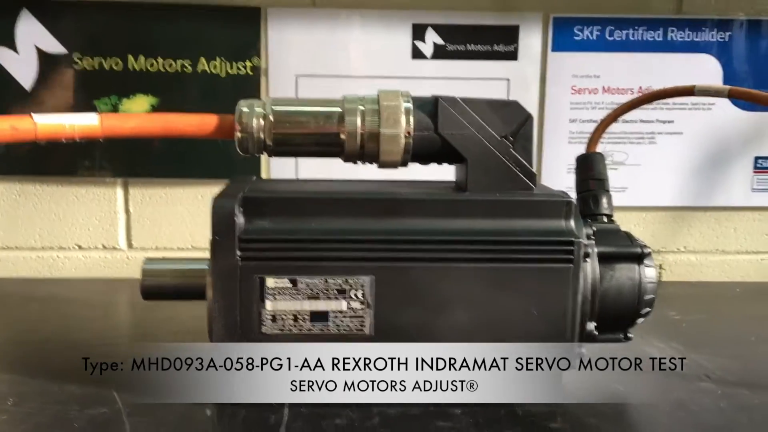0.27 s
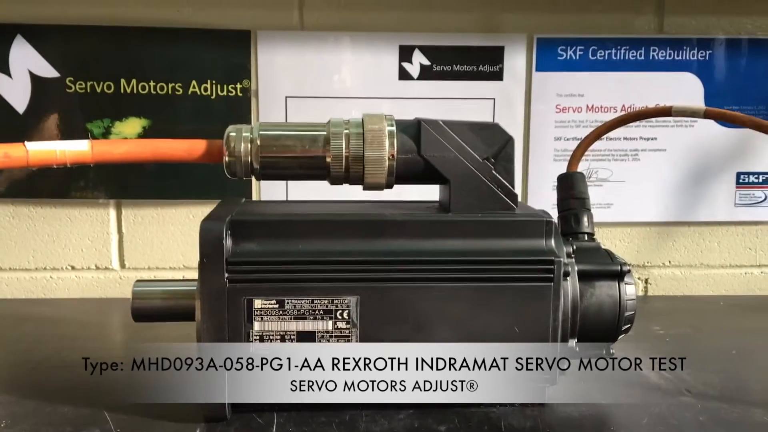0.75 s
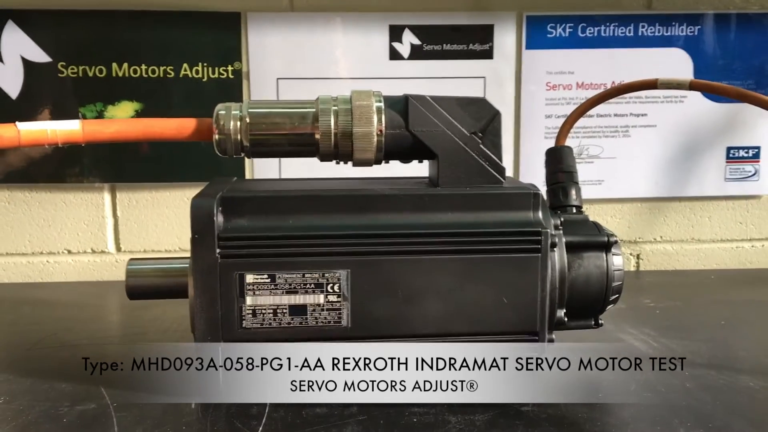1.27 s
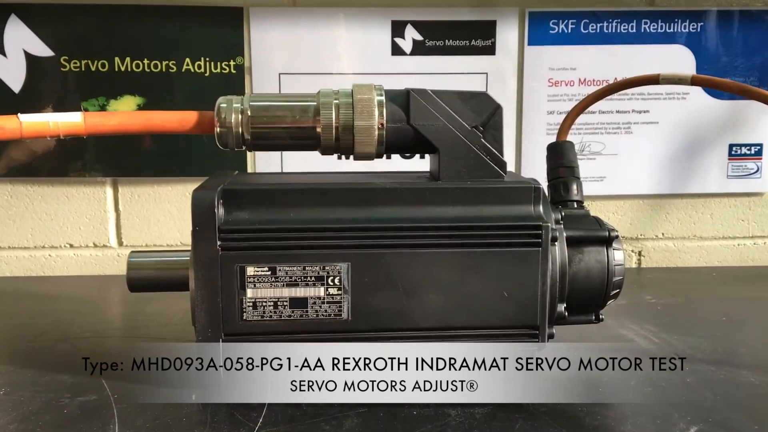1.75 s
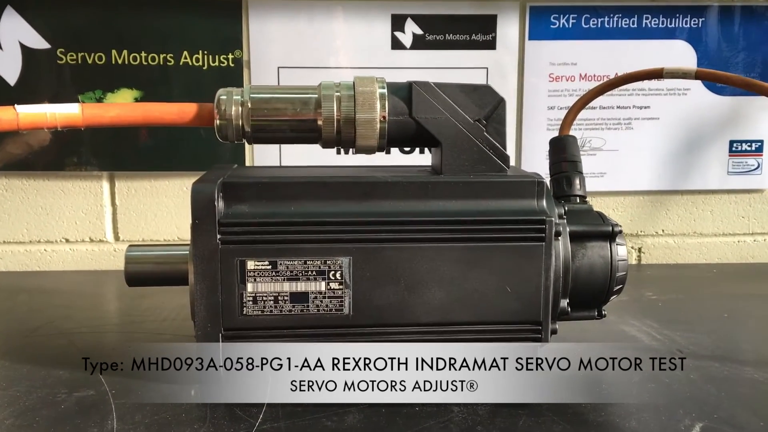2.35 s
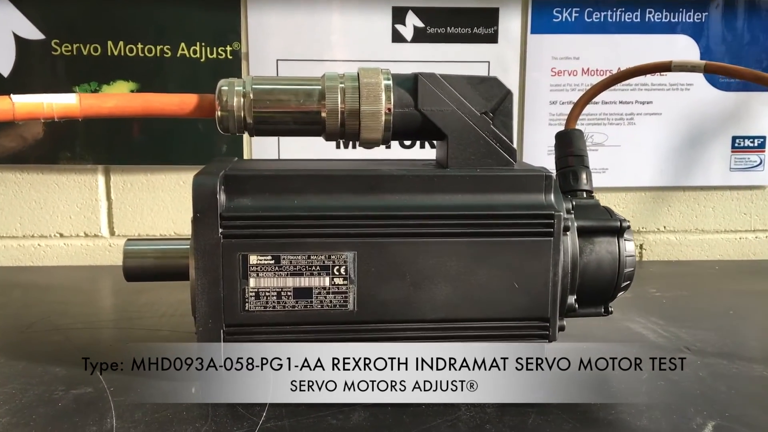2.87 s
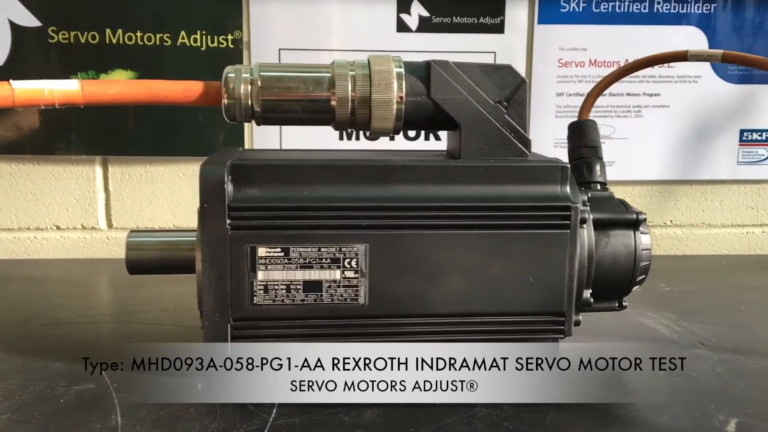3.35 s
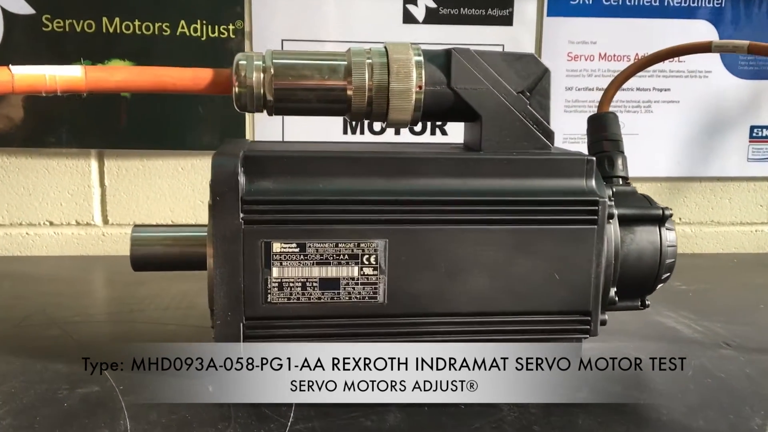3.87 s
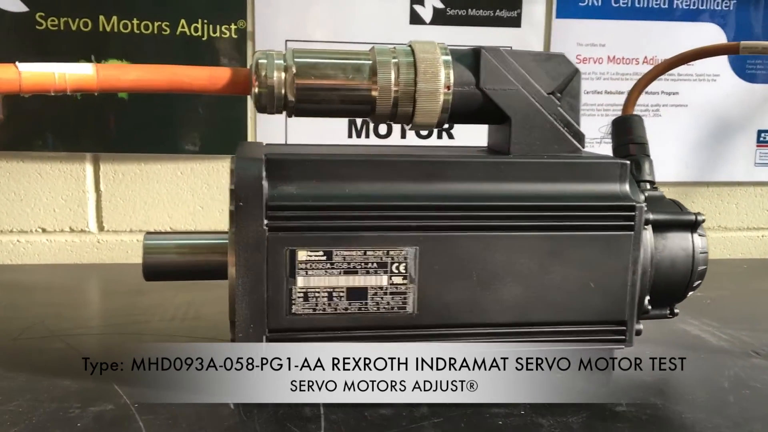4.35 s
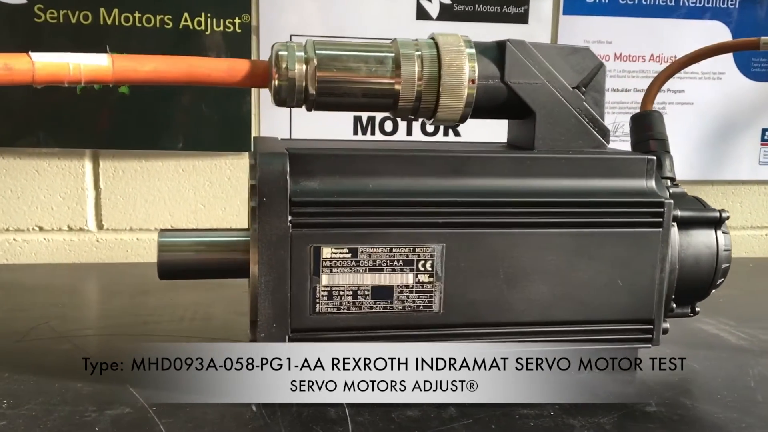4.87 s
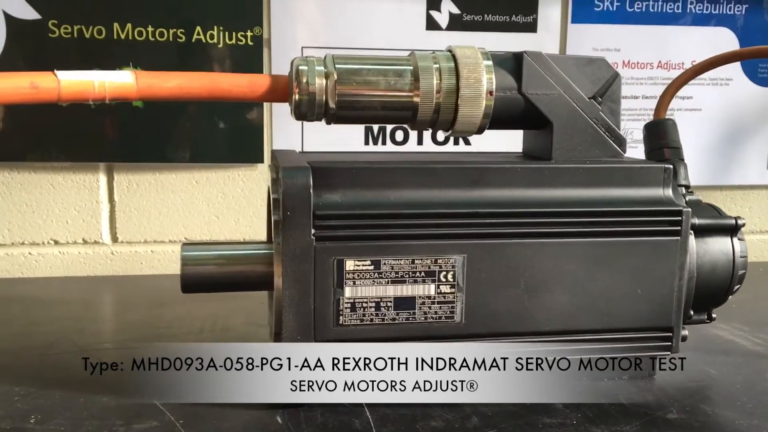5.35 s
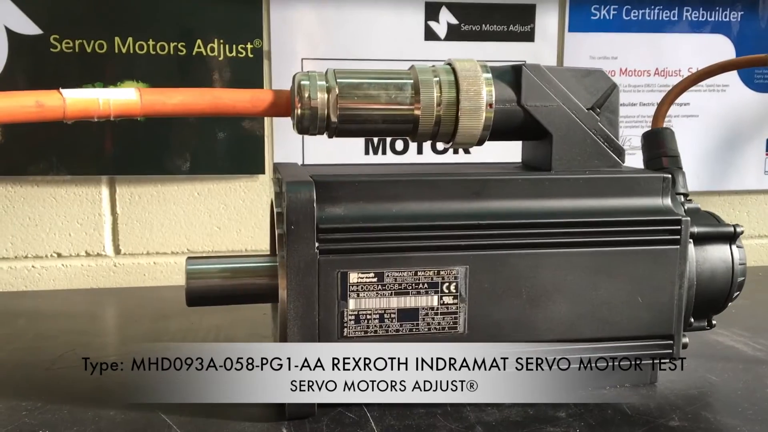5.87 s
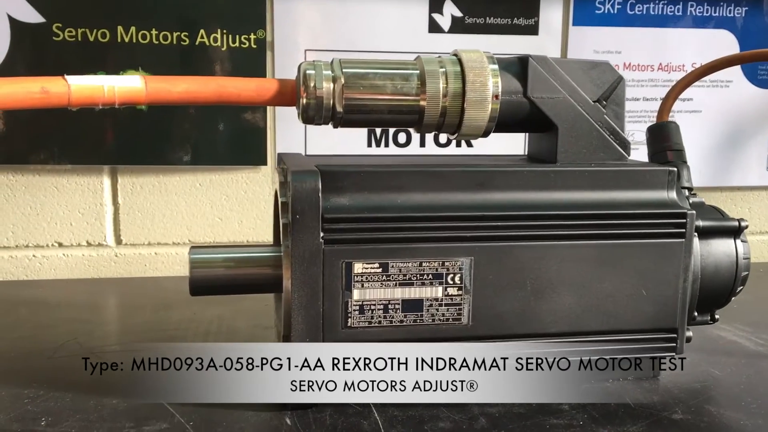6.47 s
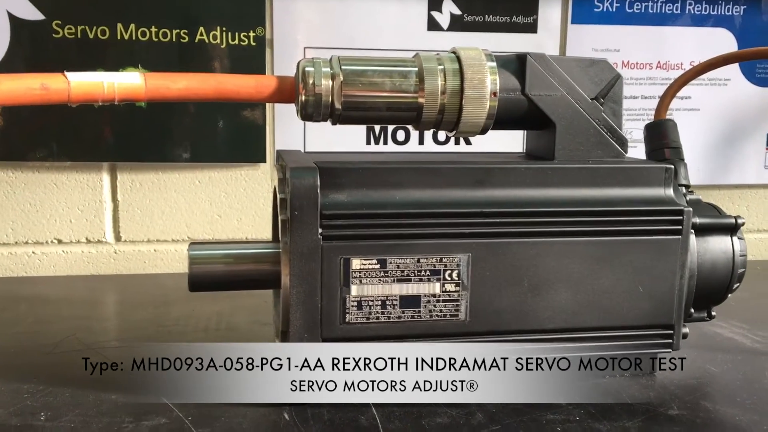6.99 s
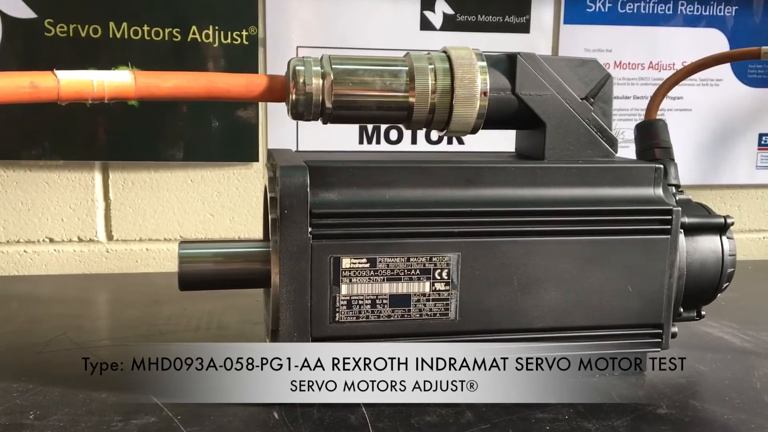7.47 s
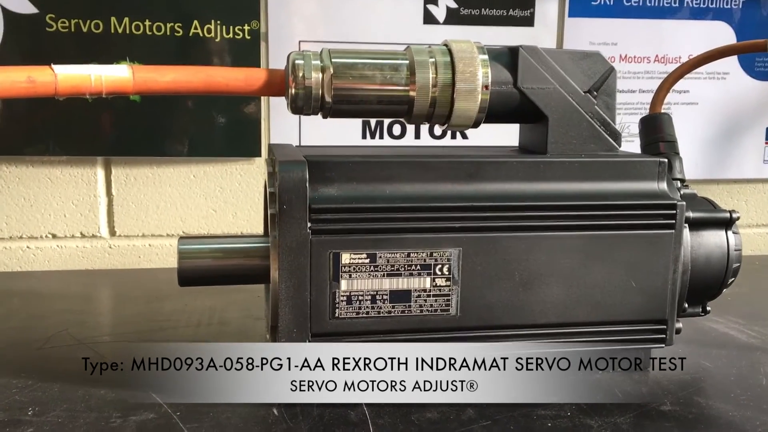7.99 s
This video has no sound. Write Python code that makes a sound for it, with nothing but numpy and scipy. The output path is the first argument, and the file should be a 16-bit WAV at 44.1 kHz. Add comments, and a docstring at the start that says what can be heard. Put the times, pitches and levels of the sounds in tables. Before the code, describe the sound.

A close hand-held microphone moves along a servo motor on an indoor workbench. A thin, very high electrical tone dominates throughout, with rushing fan air, steady fan tones and a soft, wavering low drone beneath it. The high tone dips briefly midway. A tiny double click follows, then the motor accelerates with a rising mid-pitched whine that settles at the faster speed, the high tone now stronger and slightly sizzling.

```python
"""On a workbench, a servo motor runs at 500 rpm, then ramps up to 1500 rpm. Its windings sing at the
drive's switching frequency, with modulation sidebands that spread as the speed rises, and the whine
of magnets passing slots climbs with the shaft. A cooling fan adds blade-pass tones and a steady rush
of air, a low drone wanders in pitch, and one faint double click sounds just before the ramp.
Levels and colour shift as a hand-held microphone moves along the motor."""
import sys
import numpy as np
from scipy.fft import rfft, irfft, next_fast_len
from scipy.io import wavfile
from scipy.ndimage import map_coordinates

SR = 44100
rng = np.random.default_rng(int(sys.argv[2]) if len(sys.argv) > 2 else 0)


def transcribe(signal):
    """Save signal, clipped to [-1, 1], as a 16-bit WAV file at the path in sys.argv[1]."""
    frames = np.atleast_2d(signal).T
    limited = np.clip(frames, -1, 1)
    pcm = np.round(limited * 32767).astype(np.int16)
    wavfile.write(sys.argv[1], SR, pcm)


N = 362943
T = np.arange(N) / SR
SWITCH_HZ, POLE_PAIRS = 8000.2, 4

# Levels are relative; a spectrum gives level per unit bandwidth.
# microphone path: t/s, place (0 at point A, 1 at point B)
MIC_PATH = [(0, 0.043), (2, 0), (3.65, 0.3), (4.25, 0.48), (4.55, 0.98), (8.23, 0.91)]
# wandering drone: t/s, f/Hz, level/dB, octave level/dB
DRONE_PATH = [(0, 41.4, -62, -65), (0.3, 39.5, -60, -66), (0.5, 38.94, -48, -57.5), (1.0, 36.45, -46, -53),
              (1.5, 35.25, -49, -50), (1.65, 33.3, -57, -64), (1.95, 30.13, -55, -50),
              (2.25, 27.8, -63, -50), (2.55, 29.94, -63, -48), (2.9, 32.86, -62, -57),
              (3.1, 34.06, -48.5, -51), (3.55, 37.2, -45, -56), (3.75, 39.05, -55, -57),
              (4.25, 45.2, -40.5, -51.5), (4.4, 46.6, -50, -57), (4.55, 48.1, -41, -64),
              (4.67, 49.1, -55, -60), (4.8, 51.4, -44, -54), (5.15, 55, -42, -53), (5.45, 58.2, -41, -56),
              (5.9, 61.5, -35.5, -64), (6.15, 61.6, -41, -61), (6.26, 61.6, -48, -64),
              (6.42, 65.1, -43.5, -62), (6.62, 67.7, -42, -63), (6.75, 61.4, -50, -61),
              (6.92, 56, -41, -62), (7.15, 59.3, -50, -59), (7.3, 60.9, -45.5, -62), (7.58, 62.2, -41, -62),
              (7.8, 62, -67, -72)]
# the two onsets of the click: t/s, level/dB
CLICKS = [(5.744, -48), (5.748, -45)]

# spectrum of the hiss: f/Hz, level/dB
HISS_SPECTRUM = [(5000, -20), (8500, -1), (9600, -3), (10400, -6), (11900, 0), (13600, -4), (14600, -13),
                 (15800, -24)]
# envelope of the hiss: t/s, level/dB
HISS_ENVELOPE = [(0, -4), (1, -4.5), (2.4, -1), (4.1, -0.5), (4.5, 1), (5.8, 0.5), (6.6, -5), (8.23, -5)]
# brief swells of the low roar: t/s, f/Hz, level/dB
ROAR_SWELLS = [(0.5, 269, -42.5), (1.48, 244, -45), (1.86, 244, -44), (1.96, 250, -43.5), (2.09, 274, -44),
               (2.27, 244, -43.5), (2.43, 244, -45), (2.73, 247, -45), (3.2, 258, -42), (3.27, 247, -39.5),
               (3.56, 250, -45), (3.73, 258, -42), (3.94, 244, -39.5), (4.27, 258, -43), (4.62, 256, -43),
               (4.78, 250, -43), (4.91, 242, -42.5), (5.36, 247, -41), (5.42, 269, -43), (6.04, 247, -44),
               (6.38, 272, -43), (7.07, 244, -39.5), (7.18, 261, -44), (7.3, 275, -45), (7.49, 247, -43),
               (7.6, 243, -45), (7.88, 245, -45), (8.15, 245, -44.5)]
# spectrum of the air's hollow roar and the room's rumble: f/Hz, level/dB
ROAR_SPECTRUM = [(15, -37), (25, -20), (45, -5.5), (64, -6), (85, -8.5), (120, -13), (165, -18), (217, -14),
                 (247, 1.5), (275, -4), (330, -8.5), (390, -15.5), (450, -51), (900, -77)]
# spectrum of the rushing air: f/Hz, level at A/dB, level at B/dB
RUSH_SPECTRUM = [(147, -27.5, -32), (385, -4, -4), (553, 0, 0), (610, -1.5, 2), (730, 1.5, -0.5),
                 (850, -2, 2), (1080, -1.5, 2), (1210, 2.5, 4), (1420, -1, 1.5), (1560, 5, 1),
                 (1820, -4, 2.5), (1950, 4, 1), (2080, 0, 1.5), (2430, 1, 5), (2680, -2.5, -2),
                 (2800, -1, 2), (2830, -6.5, 0.5), (3066, -2, -1.5), (3220, 1.5, 1), (3450, 1.5, -2),
                 (3550, -1, -2.5), (3820, -2, 2.5), (4360, -0.5, 2.3), (4690, -7, -5.5), (6080, -8, -6.5),
                 (6870, -10.5, -11.5), (7550, -19, -13), (8500, -44.5, -34.5), (15800, -59.5, -62)]
# envelope of rush and roar together: t/s, level/dB
AIR_ENVELOPE = [(0, 0), (2, 0.45), (4.7, 0.26), (6.8, -1.16), (8.23, -1.45)]

# blade-pass frequency: t/s, f/Hz
BLADE_PASS = [(0, 400.8), (1.9, 402.1), (2.7, 401.1), (3.7, 401.8), (4.55, 400.3), (5, 400.9), (6.7, 400.4),
              (8.23, 401)]
# blade harmonics 2 (the strongest) to 6 along the microphone's path: t/s, level/dB
BLADE_2 = [(0, -44.5), (0.37, -43), (0.85, -44), (1.6, -42), (1.73, -44.5), (2.2, -41.5), (2.6, -44),
           (2.82, -41), (3.25, -46.5), (3.5, -41.5), (3.8, -43.5), (4.4, -41.5), (4.8, -41), (5.1, -44),
           (5.45, -43.5), (6.6, -43), (7.5, -44.5), (8.23, -43.5)]
BLADE_3 = [(0, -54.5), (0.72, -52), (1.15, -57.5), (1.5, -50.5), (1.95, -53), (2.3, -63), (2.7, -59),
           (2.98, -51), (3.5, -62), (3.7, -57), (4.3, -57.5), (4.65, -51), (4.85, -57), (5.5, -58),
           (5.85, -53.5), (6.5, -56.5), (7.3, -57), (7.5, -60), (8.23, -63)]
BLADE_4 = [(0, -50), (0.2, -47.5), (0.35, -53.5), (0.9, -55.5), (1.8, -50.5), (2.3, -57.5), (2.85, -51.5),
           (3.3, -55), (4.55, -55), (5.1, -65), (6, -60.5), (7.1, -56), (7.45, -58), (7.6, -64),
           (8.23, -59)]
BLADE_5 = [(0, -53), (0.2, -47.5), (0.6, -47), (0.75, -53), (1.0, -48), (1.7, -48.5), (2.02, -44),
           (2.3, -49.5), (2.47, -57), (2.6, -46.5), (2.83, -47.5), (3.03, -57), (3.35, -49.5), (3.7, -49),
           (3.95, -59), (4.25, -48), (4.42, -61), (4.6, -51), (4.8, -65), (8.23, -68)]
BLADE_6 = [(0, -58), (0.6, -61), (2.1, -55), (3.2, -63), (3.9, -62), (4.35, -55), (4.52, -46), (4.9, -51),
           (5.9, -50.5), (6.4, -48.3), (7.07, -48.3), (7.22, -54), (7.35, -47), (7.65, -47.5),
           (8.23, -47.5)]
# weak blade harmonics 1, 7 and 8: level at A/dB, level at B/dB
WEAK_BLADE_LEVELS = [(-62, -56), (-62, -67.5), (-67, -61.5)]
# faint fan tones: multiple of the blade-pass frequency, level at A/dB, level at B/dB
FAINT_FAN_TONES = [(1.6, -66, -64), (2.35, -70, -62), (4.8, -72, -61), (5.8, -65, -68), (11, -72, -65)]

# rotation frequency of the shaft: t/s, f/Hz
SHAFT_SPEED = [(0, 25 / 3), (5.83, 25 / 3), (6.895, 25), (8.23, 25)]
# magnetic hum and slot whine at full speed: multiple of the shaft frequency, level/dB
ROTOR_ORDERS = [(4, -56), (8, -56), (33, -63), (34, -56.5), (35, -46), (36, -53), (37, -61)]
# frequency response of housing and room: f/Hz, gain/dB
HOUSING_RESPONSE = [(33, -3.5), (68, -2.5), (78, 13.5), (90, 10), (100, 0.5), (115, 8), (140, 5), (165, 0),
                    (180, -7), (200, 1), (300, 2), (380, 1), (420, 0), (465, -0.5), (500, -13), (550, -3),
                    (585, -4), (620, -4), (700, -1), (745, -3), (815, -1), (850, -0.5)]
# switching tone at the moving microphone: t/s, level/dB
CARRIER_ENVELOPE = [(0.0, -30), (0.66, -28.5), (0.92, -30), (2.86, -30), (3.03, -31.3), (3.44, -29),
                    (3.62, -31.3), (3.85, -28.5), (3.97, -30.5), (4.06, -33), (4.2, -31), (4.26, -35),
                    (4.42, -35), (4.79, -40), (5.02, -33), (5.75, -32), (6.05, -28), (6.72, -24),
                    (8.23, -25)]
# narrow band of noise round the switching tone: offset f/Hz, level/dB
SKIRT_SPECTRUM = [(3, 2.5), (25, -1.5), (60, -7.5), (120, -12), (250, -18.5), (400, -41), (900, -70)]
# lower and upper sideband at idle speed: level at A/dB, level at B/dB
LOWER_SIDEBAND = (-47.5, -59.5)
UPPER_SIDEBAND = (-53.5, -55.5)
# switching products: carrier multiple, offset in multiples of the field frequency,
# level re the carrier at full speed/dB, growth per e-fold of speed/dB
SWITCHING_PRODUCTS = [(1, -8, -47, 10), (1, 8, -48, 10), (2, -4, -46.5, -11), (2, -6, -43.5, 5),
                      (2, -10, -49, 14), (4, -2, -34.5, 6), (4, 2, -37.5, 5), (4, 0, -53, 0),
                      (4, -4, -50, 10), (4, -6, -52, 10), (4, 6, -53, 10)]
# spectrum of the sizzle round the folded products: f/Hz, level/dB
SIZZLE_SPECTRUM = [(9500, -61), (11200, -10), (12050, 2.5), (12800, -8), (15000, -45.5)]


def amp(db):
    """The decibel law: amplitude grows tenfold every 20 dB."""
    return 10 ** (np.asarray(db) / 20)


def curves(rows):
    """Linear interpolation in time: one curve for each column after the first."""
    times, *columns = np.transpose(rows)
    return [np.interp(T, times, column) for column in columns]


def at_place(place, a_db, b_db):
    """Linear interpolation of a level between points A and B."""
    return a_db + place * (b_db - a_db)


def wobble(rate):
    """Smooth random fluctuation: a spline through `rate` Gaussian values a second."""
    return map_coordinates(rng.standard_normal(int(N * rate / SR) + 4), [T * rate])


def tone(hz):
    """Phase is the integral of frequency: a sine of rms 1 that follows hz."""
    return np.sqrt(2) * np.sin(2 * np.pi * (np.cumsum(hz) / SR + rng.random()))


def noise(hz, db, ripple_db=0):
    """Spectral shaping of white noise, to rms 1; random ripple stands for near reflections."""
    size = next_fast_len(N + 8192)
    f = np.fft.rfftfreq(size, 1 / SR)
    ripple = map_coordinates(rng.standard_normal(1024), [f / 30])
    gain = amp(np.interp(np.log(f + 1), np.log(hz), db) + ripple_db * ripple)
    shaped = irfft(rfft(rng.standard_normal(size)) * gain, size)[:N]
    return shaped / np.sqrt(np.mean(shaped ** 2) + 1e-20)


def drone():
    """Slow frequency and amplitude modulation: a deep hum and its unsteady octave wander and boom."""
    hz, hum_db, octave_db = curves(DRONE_PATH)
    hum = amp(hum_db + wobble(8.8)) * tone(hz)
    octave = amp(octave_db + 2 * wobble(8.6)) * tone(2 * hz + 2.2 * wobble(13))
    return hum + octave


def double_click(t60_s=0.008):
    """Exponential decay: two abrupt bursts of bright noise make a tiny click."""
    envelope = sum(amp(db - 60 * np.abs(T - onset) / t60_s) * (T >= onset) for onset, db in CLICKS)
    return envelope * noise(hz=[1500, 5000, 14000, 17000], db=[-30, 0, -3, -20])


def hiss(level_db=-66):
    """Band-limited noise: a fine, airy hiss above the rush."""
    envelope_db, = curves(HISS_ENVELOPE)
    return amp(level_db + envelope_db) * noise(*np.transpose(HISS_SPECTRUM))


def roar_swells(sigma_s=0.031, waver_hz=4):
    """Gaussian tone bursts: the low roar swells briefly now and then, near 250 Hz."""
    waver = waver_hz * wobble(30)
    return sum(amp(db) * np.exp(-0.5 * ((T - peak_s) / sigma_s) ** 2) * tone(hz + waver)
               for peak_s, hz, db in ROAR_SWELLS)


def airflow(place):
    """Broadband flow noise: the fan's rush, crossfaded in power from A to B, over a hollow roar."""
    hz, a_db, b_db = np.transpose(RUSH_SPECTRUM)
    rush_a = amp(-41) * np.sqrt(1 - place) * noise(hz, a_db, ripple_db=2)
    rush_b = amp(-40.5) * np.sqrt(place) * noise(hz, b_db, ripple_db=2)
    roar = amp(-42.5 + 0.33 * wobble(12)) * noise(*np.transpose(ROAR_SPECTRUM))
    rush = (rush_a + rush_b) * amp(0.42 * wobble(6))
    envelope_db, = curves(AIR_ENVELOPE)
    return amp(envelope_db) * (rush + roar)


def fan_blades(place, jitter_hz=0.2, roughness=0.13, haze=0.22):
    """Periodic blade passage radiates a harmonic series, which the turbulent inflow modulates."""
    blade_hz, = curves(BLADE_PASS)
    second_db = curves(BLADE_2)[0] + 0.5 * wobble(8)
    out = amp(second_db) * tone(2 * blade_hz) * (1 + 0.12 * wobble(22))
    # the other harmonics each lie in a narrow haze of noise
    levels = [curves(rows)[0] for rows in (BLADE_3, BLADE_4, BLADE_5, BLADE_6)]
    levels += [at_place(place, *pair) for pair in WEAK_BLADE_LEVELS]
    for harmonic, harmonic_db in zip((3, 4, 5, 6, 1, 7, 8), levels):
        hz = harmonic * (blade_hz + jitter_hz * wobble(12))
        gain = amp(harmonic_db + 0.25 + 0.2 * wobble(3.2))
        partial = tone(hz) * (1 + roughness * wobble(30))
        out += gain * (partial + haze * tone(hz) * wobble(150))
    for multiple, a_db, b_db in FAINT_FAN_TONES:
        out += amp(at_place(place, a_db, b_db)) * tone(multiple * blade_hz) * (1 + 0.3 * wobble(18))
    return out


def rotor(shaft_hz, whine_growth_db=11, hum_growth_db=3, roughness=0.079, level_db=-1):
    """Forced vibration: magnets passing slots hum and whine at multiples of the shaft frequency."""
    angle = 2 * np.pi * np.cumsum(shaft_hz) / SR
    log_speed = np.log(shaft_hz / shaft_hz.max())
    out = np.zeros(N)
    for order, db in ROTOR_ORDERS:
        growth_db = hum_growth_db if order <= 2 * POLE_PAIRS else whine_growth_db
        # each order swells and fades as it sweeps through the resonances
        response_db = np.interp(order * shaft_hz, *np.transpose(HOUSING_RESPONSE))
        # neighbouring orders are locked in phase, so they beat once a turn
        partial = np.sqrt(2) * np.cos(order * angle) * (1 + roughness * wobble(25))
        out += amp(db + growth_db * log_speed + response_db) * partial
    return amp(level_db) * out


def windings(shaft_hz, place, grit=0.045, sideband_growth_db=7):
    """Modulation: windings sing at the switching frequency; the turning field adds sidebands."""
    field_hz = POLE_PAIRS * shaft_hz
    field_phase = 2 * np.pi * np.cumsum(field_hz) / SR
    carrier_hz = np.full(N, SWITCH_HZ)
    carrier_phase = 2 * np.pi * SWITCH_HZ * T
    carrier_db, = curves(CARRIER_ENVELOPE)
    # a narrow band of noise roughens the high 8 kHz tone
    skirt = grit * sum(noise(*np.transpose(SKIRT_SPECTRUM)) * tone(carrier_hz) for _ in range(2))
    # a slightly eccentric rotor makes it throb once and twice a turn
    throb = 1 + 0.014 * tone(shaft_hz) + 0.027 * tone(2 * shaft_hz) + 0.025 * wobble(21)
    out = amp(carrier_db - 0.28) * (np.sqrt(2) * np.sin(carrier_phase) * throb + skirt)
    # sidebands a quarter cycle apart swing the tone in both amplitude and phase
    rise_db = sideband_growth_db * np.log(shaft_hz / shaft_hz.min())
    lower_db = at_place(place, *LOWER_SIDEBAND) + rise_db - 3 * wobble(2)
    upper_db = at_place(place, *UPPER_SIDEBAND) + rise_db - 3 * wobble(2)
    lower = amp(lower_db) * np.sin(carrier_phase - 2 * field_phase)
    upper = amp(upper_db) * np.cos(carrier_phase + 2 * field_phase)
    out += np.sqrt(2) * (lower + upper) * (1 + 0.21 * wobble(44))
    # more speed needs more voltage, so most products grow; those above SR / 2 fold to about 12 kHz
    log_speed = np.log(shaft_hz / shaft_hz.max())
    for multiple, offset, db, growth_db in SWITCHING_PRODUCTS:
        gain = amp(carrier_db - 1 + db + growth_db * log_speed)
        out += gain * tone(multiple * carrier_hz + offset * field_hz) * (1 + 0.22 * wobble(90))
    # the many weaker products blend into a sizzle
    sizzle = amp(carrier_db - 42 + 4 * log_speed) * noise(*np.transpose(SIZZLE_SPECTRUM))
    return out + sizzle


def scene():
    """Superposition: motor, fan, drone and click add at one moving microphone."""
    shaft_hz, = curves(SHAFT_SPEED)
    place, = curves(MIC_PATH)
    motor = windings(shaft_hz, place) + rotor(shaft_hz)
    fan = fan_blades(place) + airflow(place) + hiss() + roar_swells()
    return (motor + fan + drone() + double_click())[None]


def record(dry, cutoff_hz=15760):
    """Ideal low-pass filtering: nothing above the cutoff remains."""
    size = next_fast_len(N + 8192)
    passband = np.fft.rfftfreq(size, 1 / SR) < cutoff_hz
    return irfft(rfft(dry, size) * passband, size)[..., :N]


dry = scene()
out = record(dry)
transcribe(out)
```